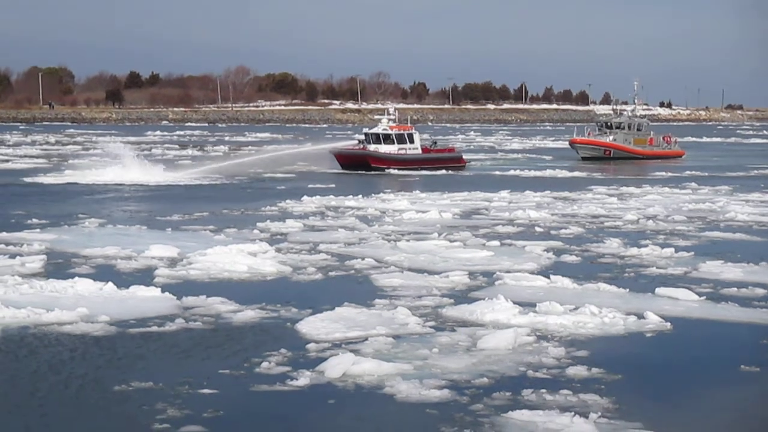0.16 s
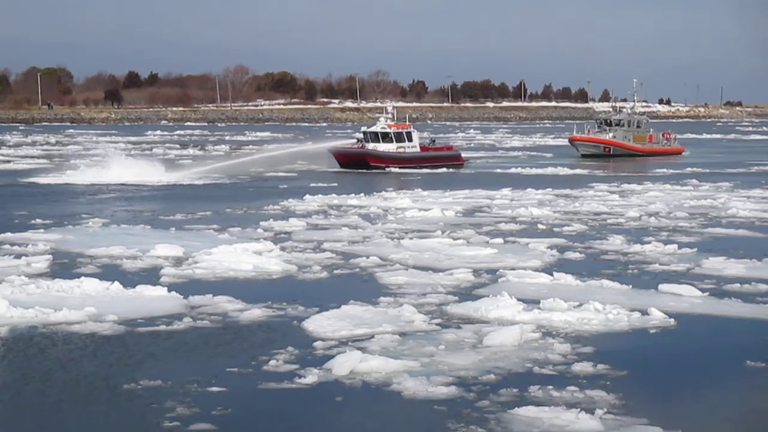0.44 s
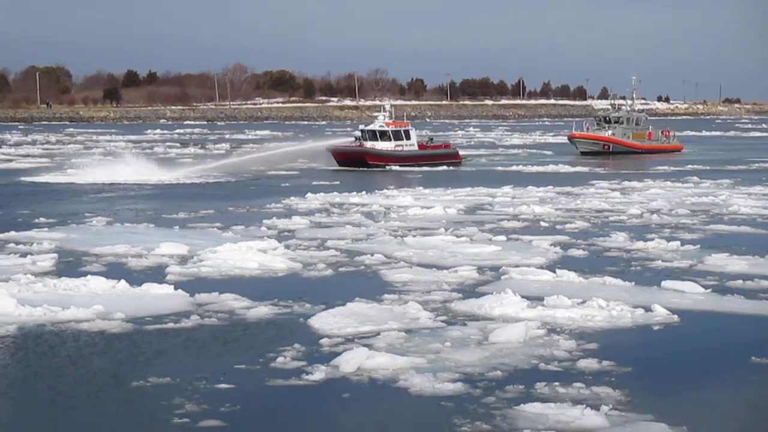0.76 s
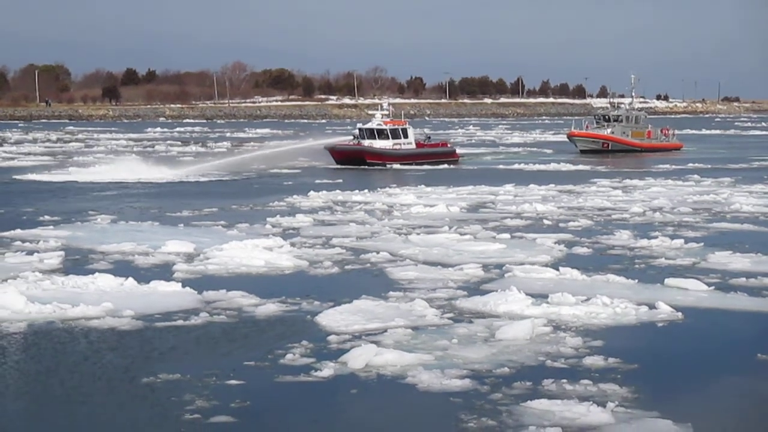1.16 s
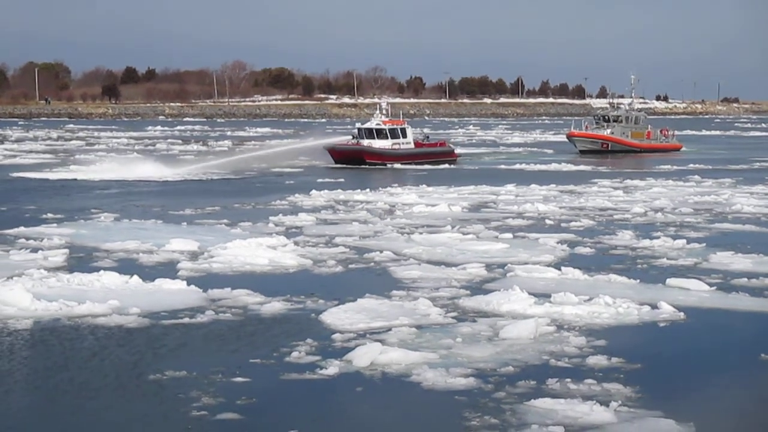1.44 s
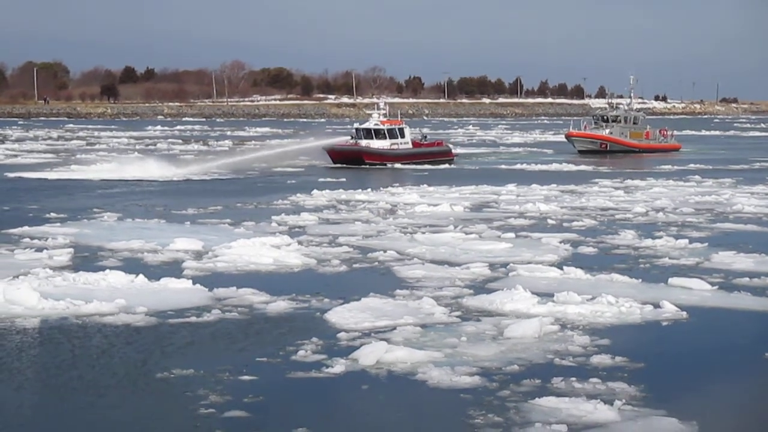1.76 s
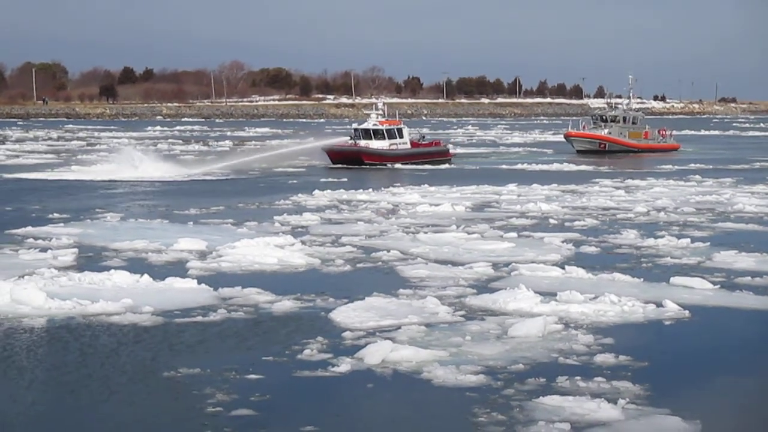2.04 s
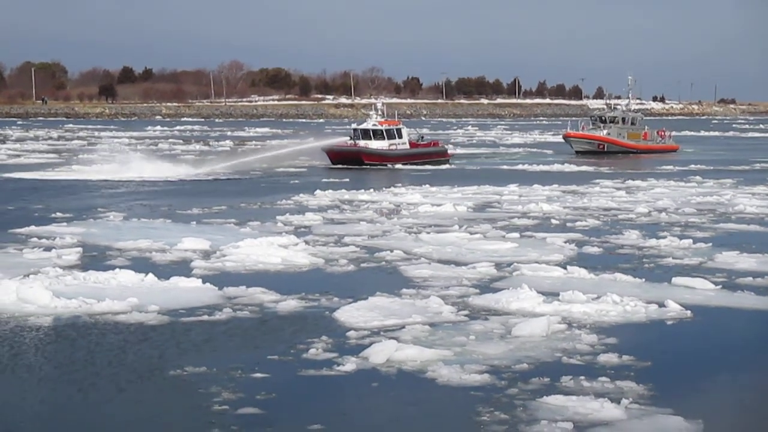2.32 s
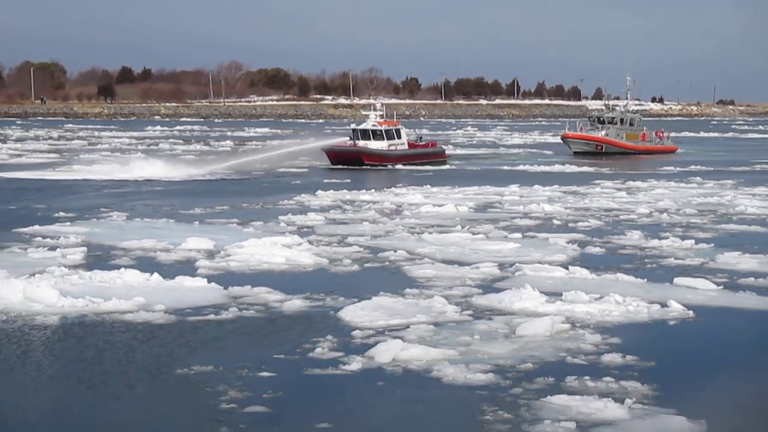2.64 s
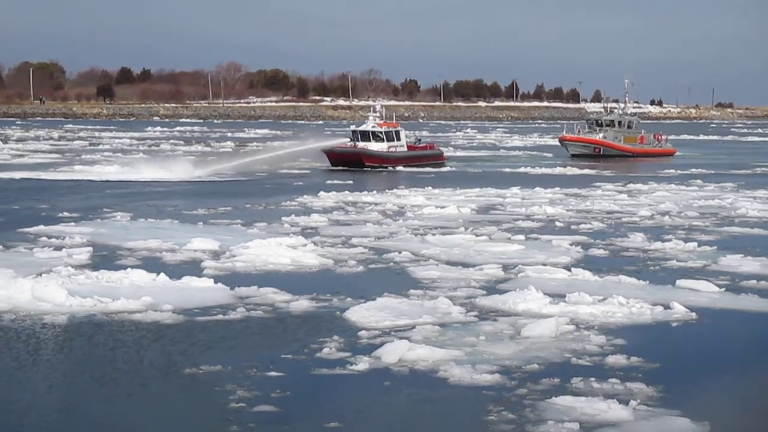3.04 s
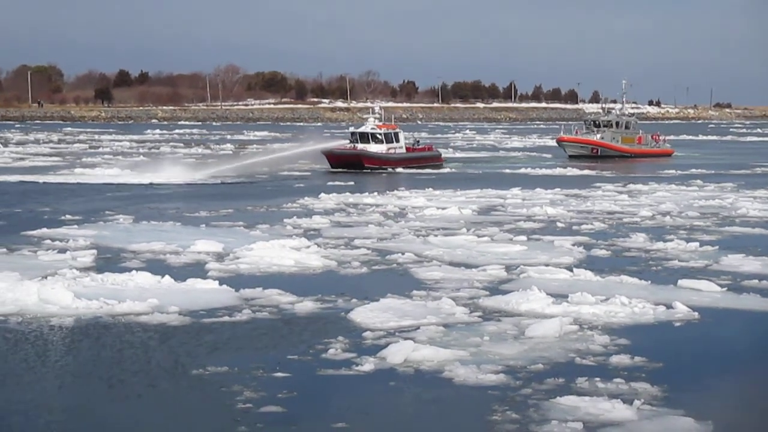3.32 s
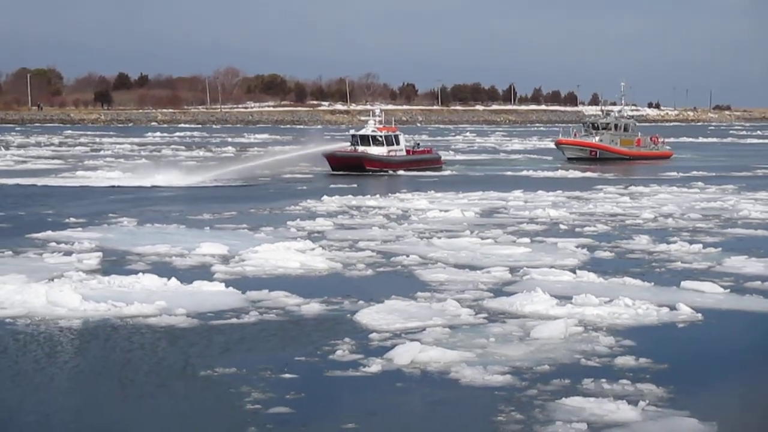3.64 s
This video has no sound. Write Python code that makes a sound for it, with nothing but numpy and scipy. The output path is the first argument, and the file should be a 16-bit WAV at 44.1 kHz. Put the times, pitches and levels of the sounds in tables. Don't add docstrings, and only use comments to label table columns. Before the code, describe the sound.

Steady boat engine drone with distant water-jet roar and hiss, under heavy wind buffeting close by

```python
import sys
import numpy as np
from scipy import signal
from scipy.io import wavfile

SR = 44100
rng = np.random.default_rng(int(sys.argv[2]) if len(sys.argv) > 2 else 0)


def attenuation_scalar(level_db):
    decades = np.asarray(level_db, float) / 20
    return 10 ** decades


def digitize_waveform(pressure):
    field = np.atleast_2d(pressure).T
    bounded = np.clip(field, -1, 1)
    quanta = np.round(bounded * 32767).astype(np.int16)
    wavfile.write(sys.argv[1], SR, quanta)


N = 166698


def rms_one(x):
    return x / np.sqrt(np.mean(x ** 2) + 1e-20)


def in_time(rows):
    start_s, *columns = np.transpose(rows)
    return [np.interp(np.arange(N) / SR, start_s, column) for column in columns]


def drift(rate_hz):
    pole = np.exp(-80 * np.pi * rate_hz / SR)
    white = rng.standard_normal(N // 40 + 2002)
    slow = signal.lfilter([1], [1, -2 * pole, pole * pole], white)[2000:]
    return np.interp(np.arange(N) / 40, np.arange(len(slow)), rms_one(slow - slow.mean()))


def cut(x, hz, kind, order):
    return signal.sosfilt(signal.butter(order, hz, kind, fs=SR, output="sos"), x)


def banded_noise(colour, patchy_db, together_db):
    colour_hz, colour_db = np.transpose(colour)
    edges_hz = 40 * 2 ** np.arange(0, 8.7, 1 / 3)
    white = rng.standard_normal((2, N))
    together = drift(31)
    out = 0
    for k, (low_hz, high_hz) in enumerate(zip(edges_hz, edges_hz[1:])):
        middle = np.log(low_hz * high_hz) / 2
        level_db = np.interp(middle, np.log(colour_hz), colour_db, left=-120, right=-120)
        flicker_db = patchy_db * (drift(0.81) + drift(2.2)) + together_db * together
        band = cut(white[k % 2], [low_hz, high_hz], "band", order=2)
        band = cut(band, high_hz * 1.03, "low", order=2)
        out = out + attenuation_scalar(level_db + flicker_db) * band
    return rms_one(out)


def hollow(centre_hz, width_hz):
    band = cut(rng.standard_normal((2, N)), width_hz / 2, "low", order=2)
    turn = 2 * np.pi * np.cumsum(centre_hz + np.zeros(N)) / SR
    ringing = band[0] * np.cos(turn) + band[1] * np.sin(turn)
    return rms_one(ringing) * attenuation_scalar(0.8 * drift(8))


# start_s, firing_level_db, fourth_and_fifth_orders_db,
# third_order_db
DRONE_OVER_WATER = [(0, -24, -6.5, -4.5), (.25, -26.5, 3.5, -6), (.52, -27.5, 5, -3.5), (.8, -22.5, 0, -6),
                    (1.2, -19.5, -2, -10), (1.45, -22.5, 3, -22.5), (1.75, -22.5, 4, -8.5),
                    (2.2, -24, 4, -18), (2.6, -21, -4, -9), (2.9, -17.5, -9, -14),
                    (3.15, -21.5, -16, -18.5), (3.4, -25.5, -2, -10.5), (3.78, -24, 4, -8)]
# multiple, level_db
SHAFT_ORDERS = [(1, -31), (2, 2.5), (6, -21), (7, -26.5), (8, -27.5), (9, -36.5), (10, -38), (11, -36),
                (12, -26)]
# multiple, level_db
CARRIED_ORDERS = [(4, -9.5), (5, -21)]


def engine():
    shaft_hz, wander_hz, flutter_db, first_firing_s = 40.05, 0.015, 0.5, 0.0037
    level_db, upper_db, third_db = in_time(DRONE_OVER_WATER)
    turns = np.cumsum(shaft_hz + wander_hz * drift(0.43)) / SR - shaft_hz * first_firing_s
    turn = 2 * np.pi * turns

    def chord(orders):
        return sum(attenuation_scalar(db + flutter_db * np.sqrt(k) * drift(3)) * np.cos(k * turn) for k, db in orders)

    pulse = chord(SHAFT_ORDERS) + attenuation_scalar(upper_db) * chord(CARRIED_ORDERS)
    pulse = pulse + attenuation_scalar(third_db) * np.cos(3 * turn)
    return -np.sqrt(2) * attenuation_scalar(level_db) * pulse


# start_s, level_db, hollow_centre_hz, upper_hollow_db
ROAR_FLOW = [(0, -38.5, 469, -14.5), (.5, -37, 468, -8), (.9, -40, 475, -14.5), (1.2, -40.5, 480, -22),
             (1.5, -39, 482, -14), (1.8, -38, 500, -16.5), (2.2, -36, 480.1, -16.5), (2.5, -34.5, 490, -12),
             (2.7, -31, 510, -12), (2.9, -28.5, 500, -22), (3.05, -33.5, 500, -8), (3.2, -34, 490, 0),
             (3.4, -33, 470, -7), (3.6, -32, 500, -10.5), (3.78, -34, 520, -1)]
# pitch_hz, level_db (per Hz)
ROAR_TONE = [(35, -39.5), (60, -5), (93, -13.5), (172, -9.5), (267, -24), (470, -16.5), (877, -29.5),
             (2200, -56.5), (2860, -86.5), (4840, -120)]


def roar():
    level_db, centre_hz, upper_db = in_time(ROAR_FLOW)
    body = banded_noise(ROAR_TONE, patchy_db=1.0, together_db=2.7)
    lower = attenuation_scalar(-5.5) * hollow(centre_hz, width_hz=88)
    upper = attenuation_scalar(upper_db) * hollow(centre_hz=638, width_hz=133)
    return attenuation_scalar(level_db) * (body + lower + upper)


# start_s, level_db, fine_mist_db
SPRAY_FALL = [(0.0, -56, -4.5), (0.01, -57.5, -12), (0.28, -51.5, -13), (0.44, -51, -8), (0.67, -53, -10.5),
              (0.99, -49.5, -10), (1.28, -50, -8), (1.43, -53, -12.5), (1.68, -56, -6.5),
              (1.81, -50.5, -12.5), (2.24, -44, -11.5), (2.43, -41.5, -12.5), (2.67, -45.5, -10),
              (3.19, -42, -11), (3.39, -45.5, -14), (3.72, -44, -12.5), (3.77, -43.5, -14),
              (3.78, -46.5, -9)]
# pitch_hz, level_db (per Hz)
SPRAY_TONE = [(530, -32), (900, -4.5), (2180, -9), (2500, -1), (3050, -7), (4000, -13.5), (6000, -22),
              (9210, -31), (15600, -57)]


def spray():
    mist_hz, mist_trim_db, spray_trim_db = 4200, 11, 2.5
    echo_s, echo_db = 0.000472, -20.5
    level_db, mist_db = in_time(SPRAY_FALL)
    hiss = banded_noise(SPRAY_TONE, patchy_db=1.0, together_db=0.34)
    drops = cut(hiss, mist_hz, "low", order=3)
    mist = attenuation_scalar(mist_db + mist_trim_db) * cut(hiss, mist_hz, "high", order=3)
    water = drops + mist
    delay = echo_s * SR * (1 + 0.041 * drift(0.14))
    echo = np.interp(np.arange(N) - delay, np.arange(N), water)
    return attenuation_scalar(level_db + spray_trim_db) * (water - attenuation_scalar(echo_db) * echo)


# start_s, level_db
GUST_STRENGTH = [(0, -25), (.1, -23), (.3, -20), (.37, -27.5), (.56, -28), (.64, -19), (.8, -30),
                 (.95, -40), (1.02, -26.5), (1.3, -19), (1.44, -29.5), (1.7, -42), (2.0, -30), (2.3, -19.5),
                 (2.7, -29), (2.89, -22.5), (3.55, -20), (3.78, -24)]


def gusts():
    level_db = in_time(GUST_STRENGTH)[0]
    lumps_db = 2 * 1.5 * np.tanh(drift(11) / 1.5)
    base = rms_one(cut(rng.standard_normal(N), 79, "low", order=2))
    edge = cut(rng.standard_normal(N), 199, "low", order=3)
    edge = rms_one(cut(edge, 45, "high", order=2))
    return attenuation_scalar(level_db) * (attenuation_scalar(1.2 * lumps_db) * base + attenuation_scalar(lumps_db - 9 + lumps_db * 0) * edge)


# start_s, peak_db, swing_hz
PORT_BUFFETS = [(0.033, -10, 87), (0.048, -7.5, 170), (.078, -6.5, 66.4), (.132, -12.5, 90),
                (.163, -19, 60.6), (0.243, -17.5, 193), (0.292, -11, 125), (.320, -8.5, 101),
                (0.599, -11.5, 91), (0.632, -15.5, 327), (0.646, -7.5, 196), (0.654, -9, 109),
                (0.712, -11, 127), (1.003, -24, 110), (1.02, -18, 69.7), (1.080, -9.5, 80),
                (1.174, -21.5, 101), (1.205, -18, 70), (1.274, -20, 140), (1.312, -3, 134),
                (1.36, -25, 150), (1.39, -15, 140), (1.486, -0.5, 150), (1.603, -11.5, 155),
                (2.045, -14, 150), (2.099, -15, 120), (2.136, -16, 170), (2.206, -24, 70),
                (2.248, -13, 100), (2.317, -18, 88.5), (2.375, -16, 80), (2.455, -13.5, 46.3),
                (2.562, -14, 51.6), (2.642, -27, 59.3), (2.729, -14, 69.4), (2.81, -10, 80),
                (2.843, -10, 130), (2.872, -5.5, 49.4), (2.901, -20, 44.3), (2.942, -6.5, 146),
                (2.961, -11.5, 210), (2.987, -12, 185), (3.059, -15, 59.7), (3.122, -3.5, 70),
                (3.148, -11, 140), (3.216, -12.5, 135), (3.274, -8, 126), (3.316, -7.5, 170),
                (3.346, -8, 109), (3.427, -11, 59), (3.451, -10, 111), (3.491, -9, 99), (3.514, -8, 111.3),
                (3.536, -14.5, 150), (3.574, -6, 55), (3.605, -12, 162), (3.655, -25, 69.6),
                (1.192, -13, 192), (.270, -16, 200)]


def buffets():
    build_turns, fade_turns = 0.17, 0.51
    t = np.arange(-SR // 20, SR // 20) / SR
    out = np.zeros(N + SR)
    for start_s, peak_db, swing_hz in PORT_BUFFETS:
        late = t * swing_hz / np.where(t < 0, build_turns, fade_turns)
        push = np.exp(-0.5 * late ** 2) * np.cos(2 * np.pi * swing_hz * t)
        at = int(start_s * SR)
        out[at:at + len(t)] += attenuation_scalar(peak_db) * push
    return out[SR // 20:][:N]


# start_s, peak_db, core_hz (spin peaks at 0.56 of it, the kick
# reaches 1.38 times it), length_s
PORT_EDDIES = [(.030, -8, 305, 0.0033), (.051, -15.5, 464, 0.0079), (0.077, -18, 463, 0.0025),
               (0.137, -13.5, 430, 0.0054), (0.151, -12.5, 285, 0.0042), (0.245, -37, 218, 0.0097),
               (0.294, -10, 336, 0.009), (.321, -8, 740, 0.0041), (0.603, -16, 266, 0.014),
               (.640, -7.5, 1145, 0.0096), (0.709, -6.5, 453, 0.0046), (1.04, -13.5, 368, 0.01),
               (1.084, -18, 112, 0.0079), (1.174, -16, 970, 0.0037), (1.213, -9.5, 600, 0.0029),
               (1.310, -4.5, 845, 0.0038), (1.389, -11, 404, 0.005), (1.483, -2.5, 416, 0.0056),
               (1.601, -12, 294, 0.004), (2.046, -26, 170, 0.013), (2.128, -13.5, 410, 0.0093),
               (2.243, -15, 404, 0.004), (2.34, -4.5, 188, 0.0087), (2.822, -10.5, 236, 0.0025),
               (2.948, -6, 227, 0.0058), (3.195, -15, 330, 0.0066), (3.209, -6, 240, 0.011),
               (3.33, -13, 242, 0.0095), (3.53, -16, 266, 0.011), (.423, -28, 600, 0.0027),
               (0.641, -16.5, 1967, 0.0078), (0.635, -11.5, 554, 0.0043), (0.643, -9, 593, 0.0076),
               (0.717, -14.5, 507, 0.0029), (0.084, -18.5, 525, 0.0054), (2.683, -20.5, 550, 0.004)]


def eddies():
    slow_spin_hz, core_share, spin_scatter = 71, 0.497, 0.17
    kick_body_hz, kick_reach = 170, 1.38
    tumble_db, tumble_db_per_ms = -7, 0.94
    t = np.arange(-SR // 20, SR // 20) / SR
    out = np.zeros(N + SR)
    for start_s, peak_db, core_hz, length_s in PORT_EDDIES:
        nearness = 1 / (1 + np.abs(t / (core_share * length_s)) ** 2.14)
        spin_hz = slow_spin_hz + (0.558 * core_hz - slow_spin_hz) * nearness
        uneven = rms_one(cut(rng.standard_normal(len(t)), 210, "low", order=2))
        turn = 2 * np.pi * np.cumsum(spin_hz * (1 + spin_scatter * uneven)) / SR
        swell = np.exp(-0.5 * (t / length_s) ** 2)
        tumble = swell * np.cos(turn - turn[len(t) // 2] + 0.91 * rng.random())
        tumble = cut(tumble, core_hz * 0.94, "low", order=4)
        kick = cut(1.0 * (t == 0), kick_body_hz, "low", order=1)
        kick = cut(kick, core_hz * kick_reach, "low", order=4)
        share_db = tumble_db + tumble_db_per_ms * (1000 * length_s - 7)
        at = int(start_s * SR)
        out[at:at + len(t)] += attenuation_scalar(peak_db + 1.5) * (kick / kick.max() + attenuation_scalar(share_db) * tumble)
    return cut(out[SR // 20:][:N], 64.3, "high", order=2)


def whine():
    return attenuation_scalar(-95) * np.sin(2 * np.pi * 11793 * np.arange(N) / SR)


def scene():
    far = engine() + roar() + spray()
    near = gusts() + buffets() + eddies()
    return (far + near + whine())[None]


def roll_off(x):
    return signal.sosfilt(signal.butter(12, 15710, fs=SR, output="sos"), x)


# pitch_hz, width_hz, depth (0-1)
HOUSING_HOLLOWS = [(2137, 95, 0.44), (4100, 780, 0.13), (6560, 400, 0.4), (10500, 930, 0.2)]


def record(dry):
    x = cut(dry, 20, "high", order=2)
    for pitch_hz, width_hz, depth in HOUSING_HOLLOWS:
        b, a = signal.iirpeak(pitch_hz, pitch_hz / width_hz, fs=SR)
        x = x - depth * signal.lfilter(b, a, x)
    mix = 2.5 * np.tanh(x / 2.5)
    return roll_off(mix)


dry = scene()
out = record(dry)
digitize_waveform(out)
```